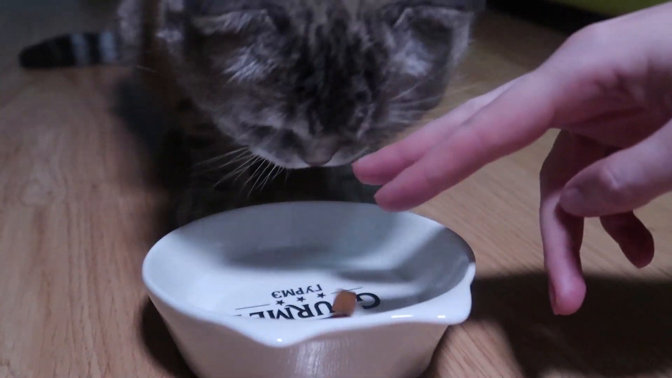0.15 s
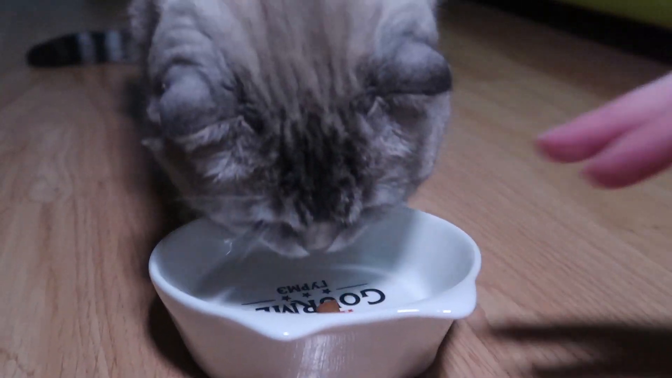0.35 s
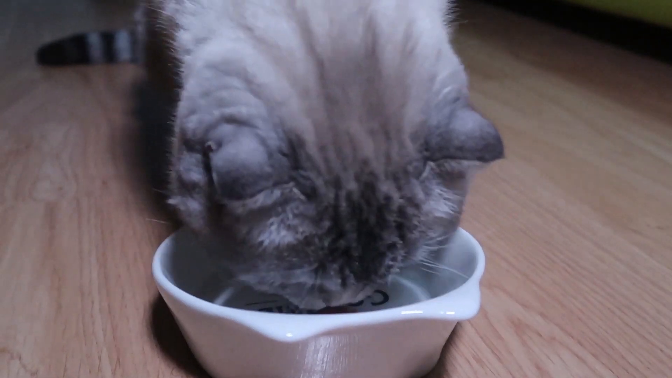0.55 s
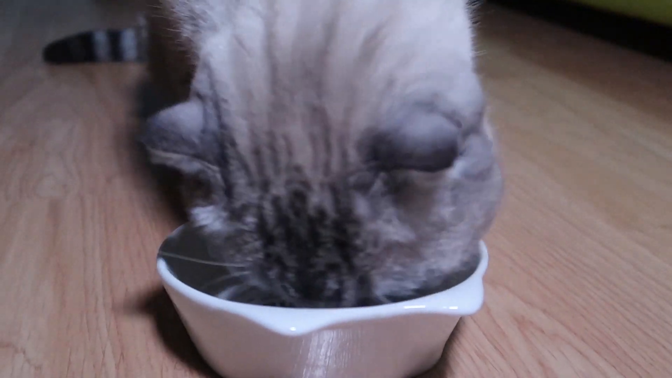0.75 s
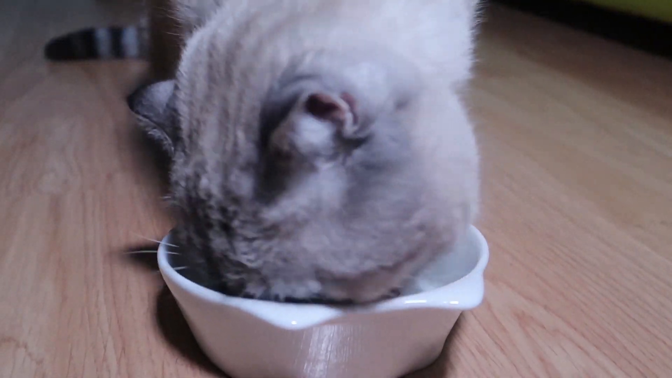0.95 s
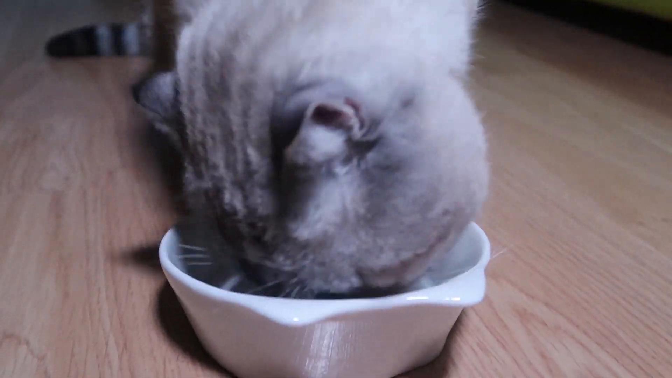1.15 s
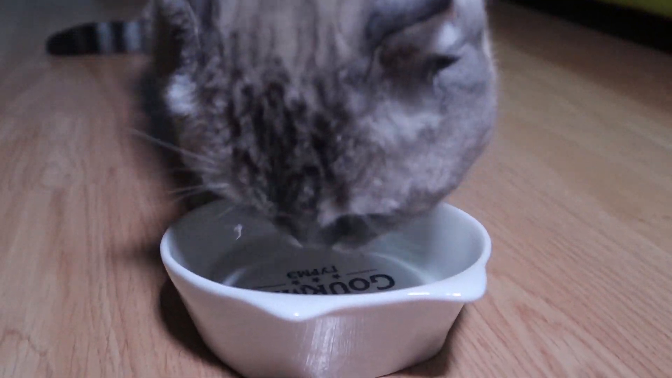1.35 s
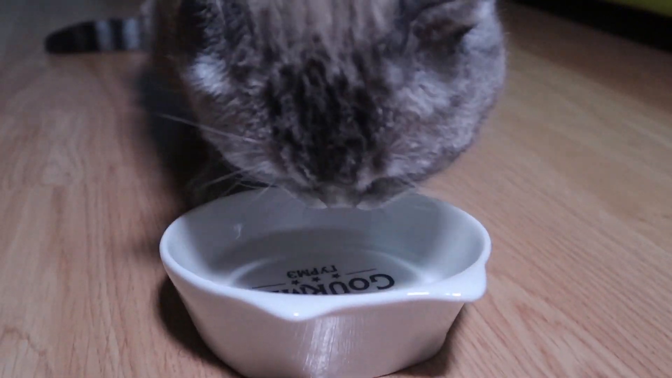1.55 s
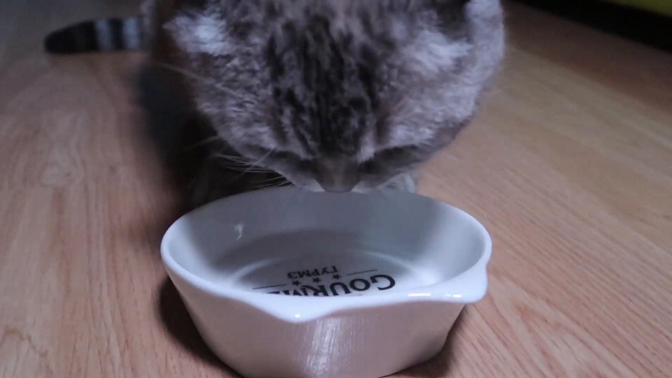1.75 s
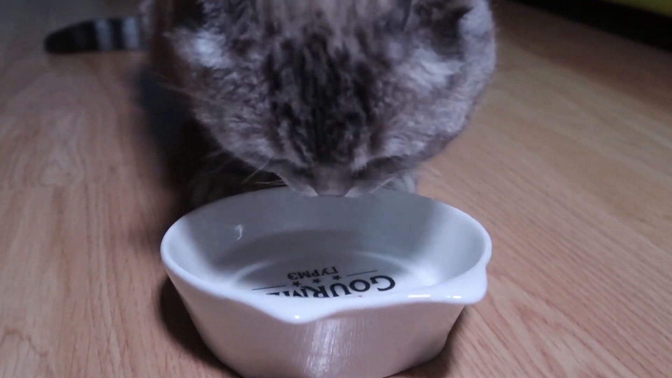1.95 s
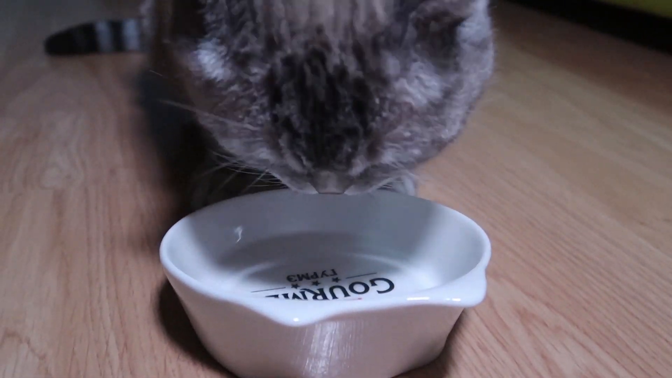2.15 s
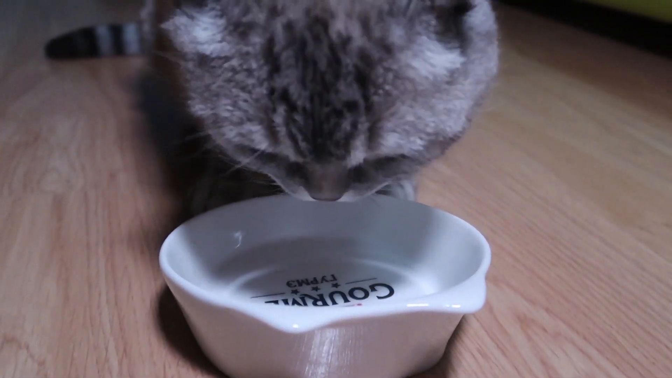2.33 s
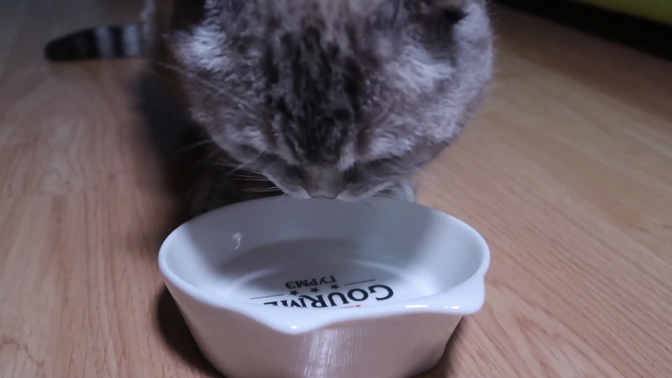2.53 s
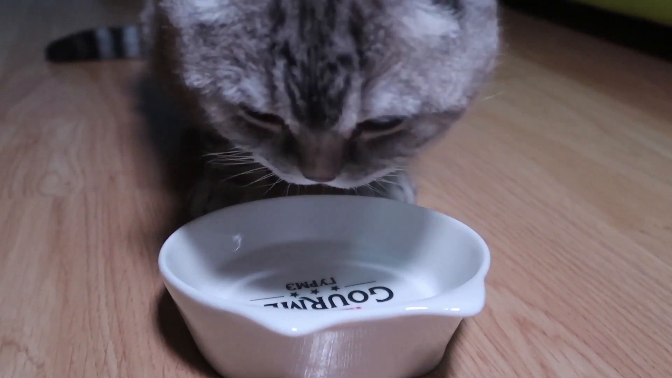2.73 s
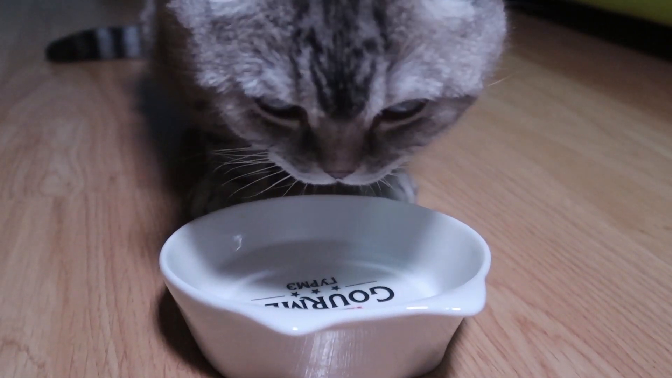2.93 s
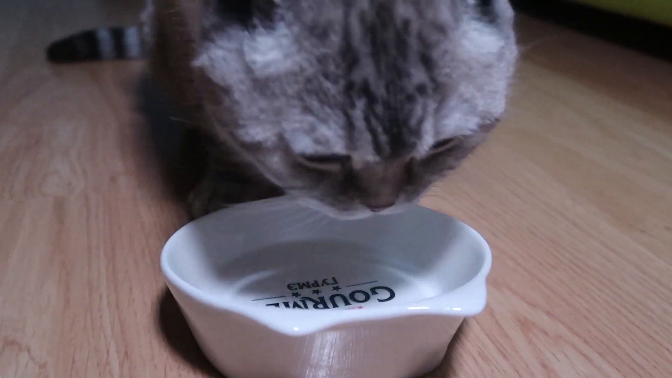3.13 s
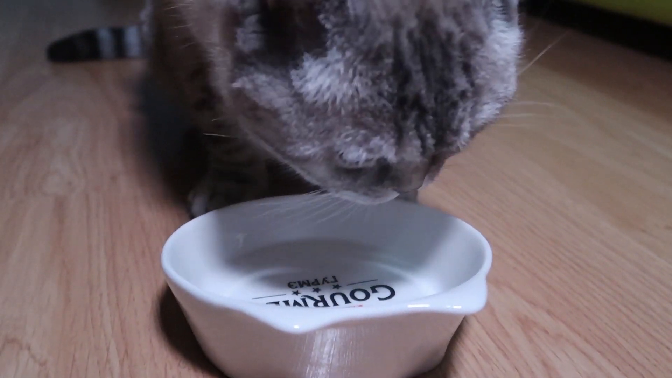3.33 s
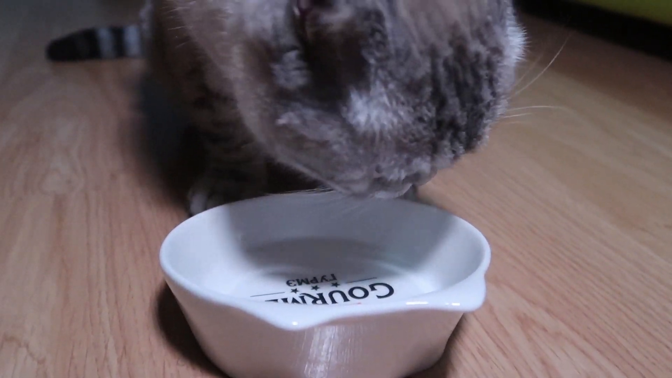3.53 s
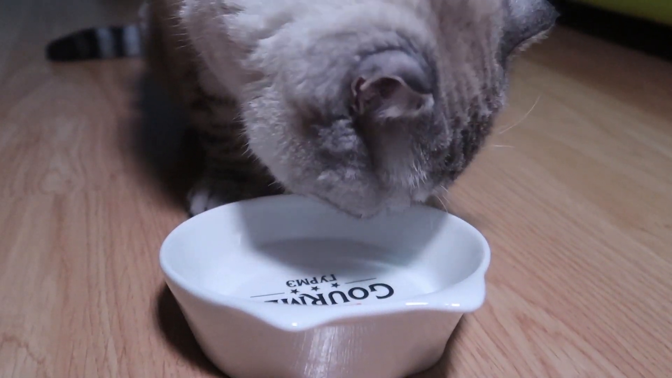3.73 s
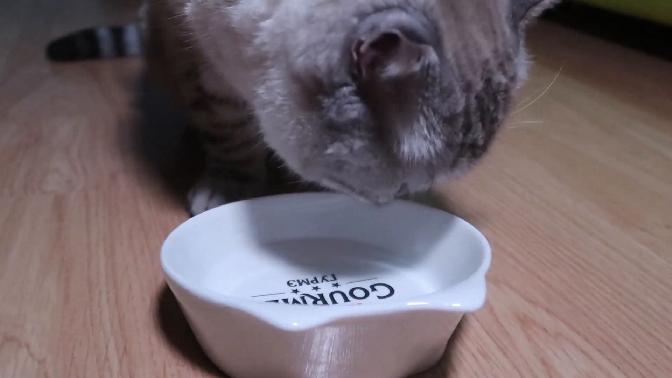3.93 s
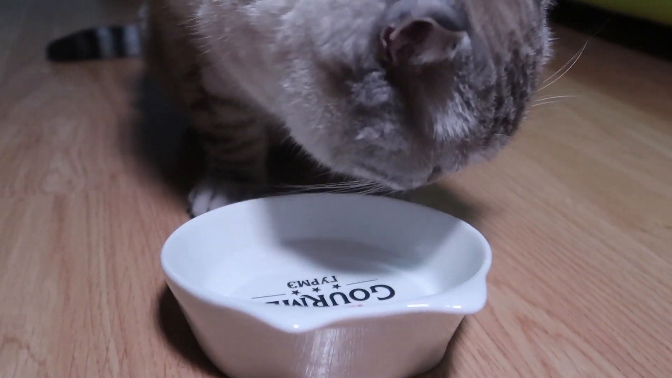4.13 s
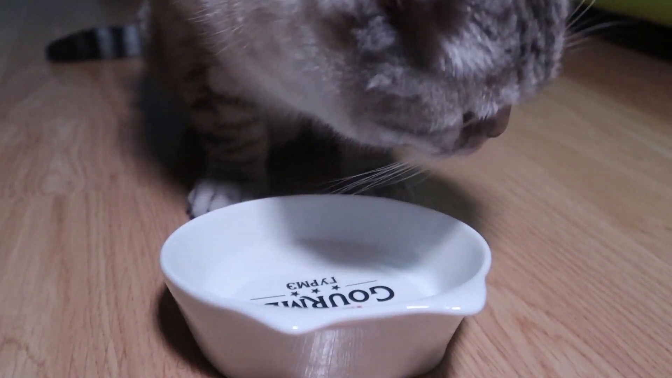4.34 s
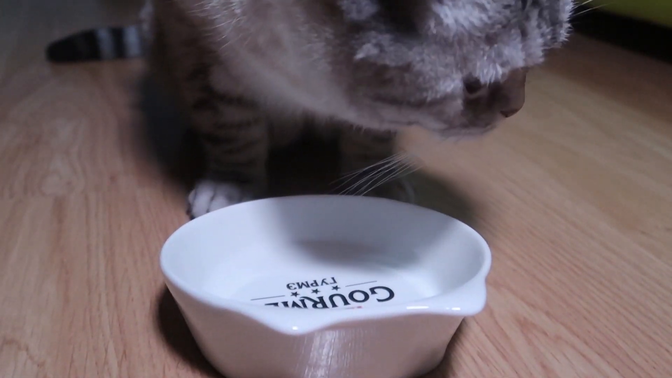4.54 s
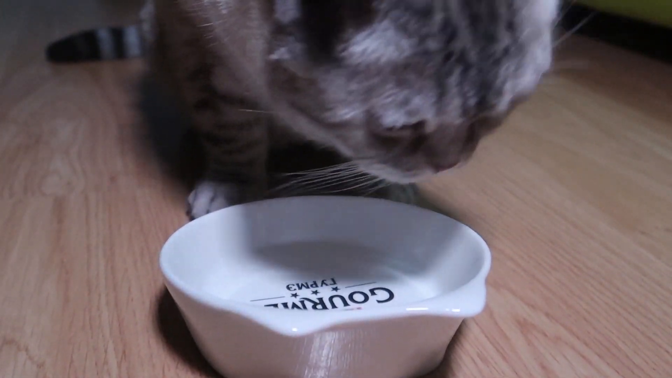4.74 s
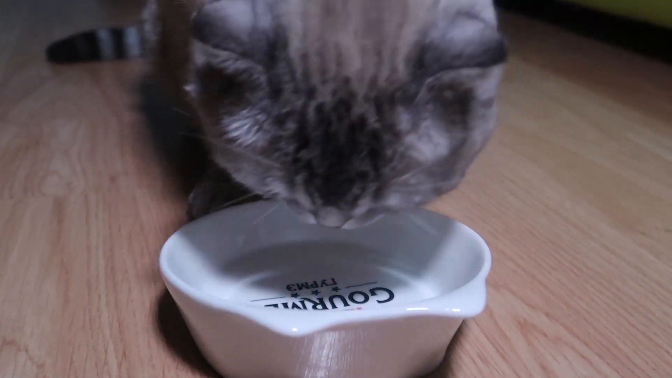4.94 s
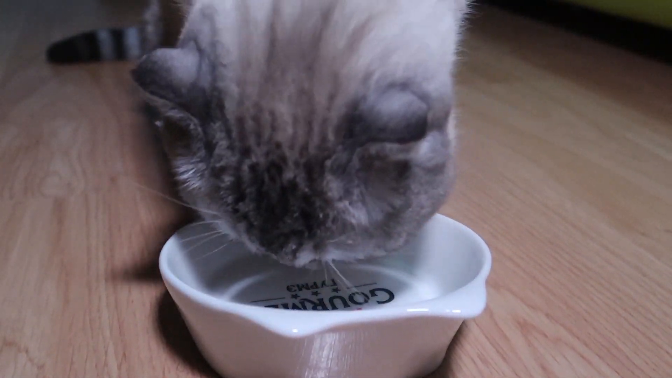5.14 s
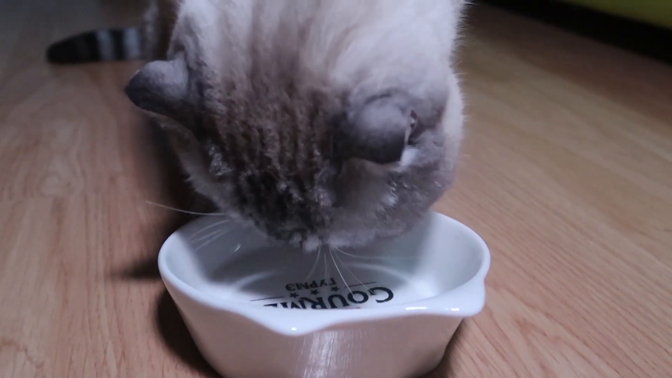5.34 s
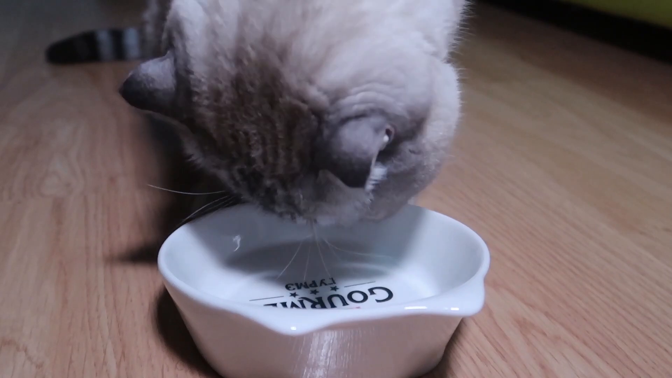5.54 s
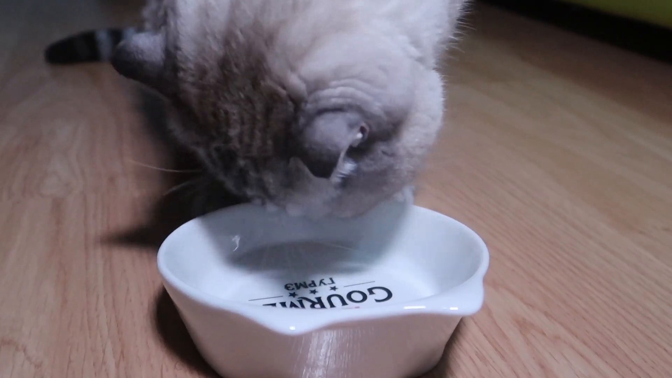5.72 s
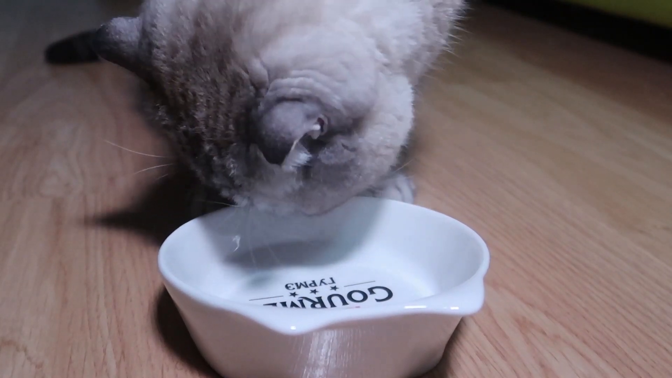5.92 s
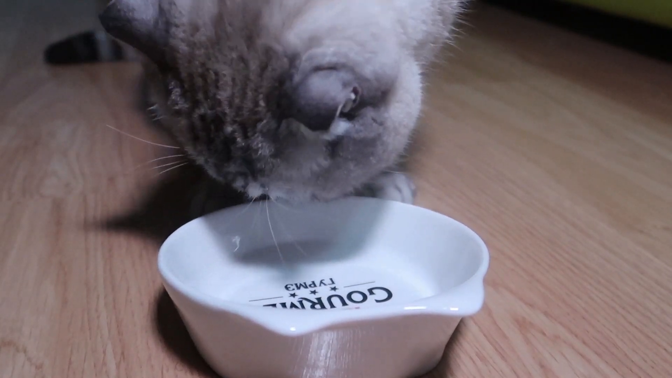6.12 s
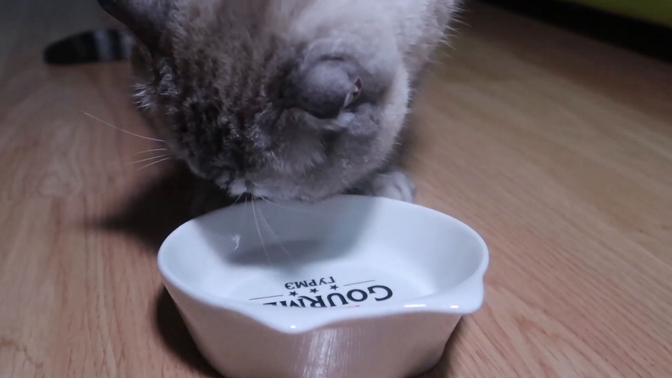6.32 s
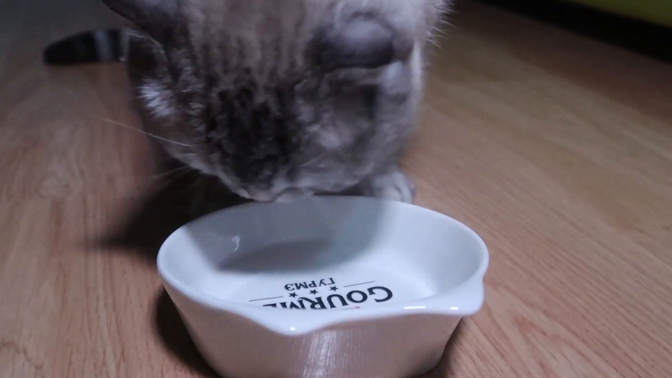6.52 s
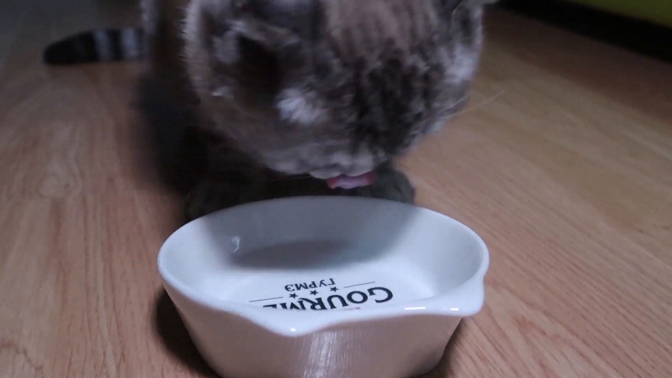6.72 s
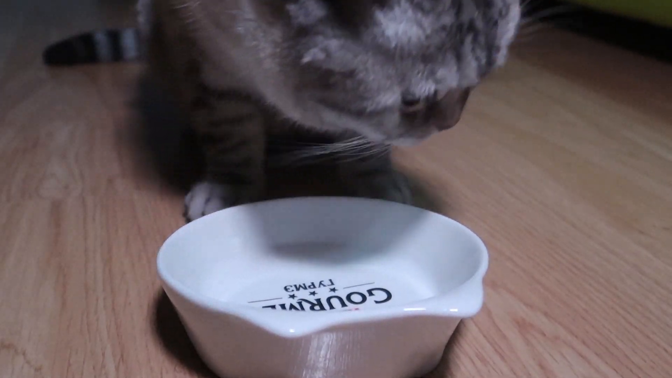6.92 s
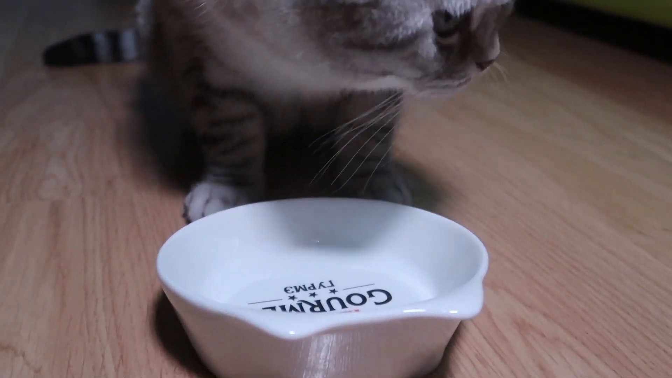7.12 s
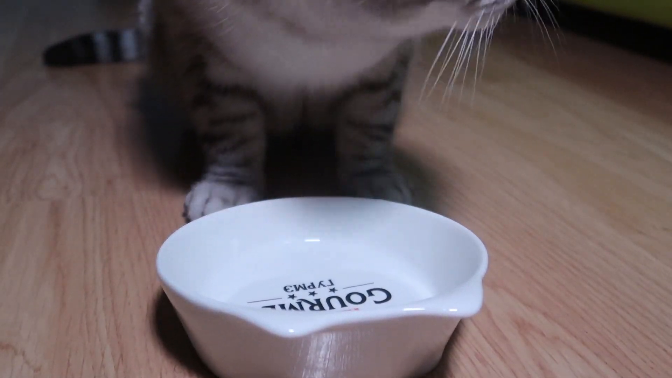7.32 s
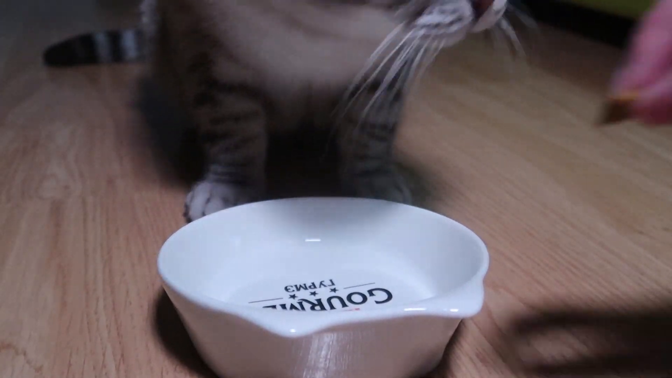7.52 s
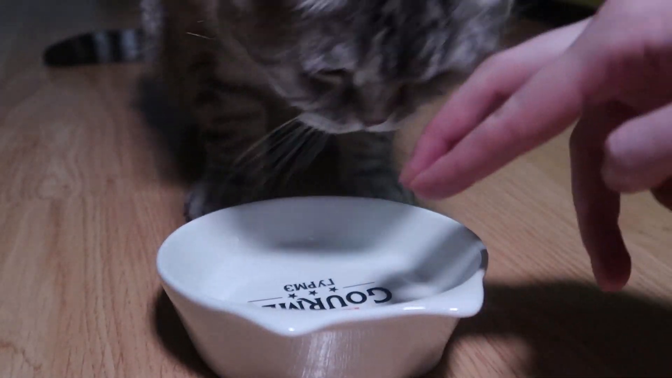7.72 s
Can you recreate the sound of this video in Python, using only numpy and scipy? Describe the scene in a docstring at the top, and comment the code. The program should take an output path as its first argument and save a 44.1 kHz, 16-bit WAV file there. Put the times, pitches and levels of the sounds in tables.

```python
"""A hard treat drops into a ceramic bowl on a wooden floor and bounces: struck modes ring, beat and clack.
A cat picks it up and smacks its lips: wet pops ring the mouth, and narrow noise makes the sticky slides.
Off to the right something crinkles and snaps, likely the treat pouch: buckling folds, rustle and hiss.
Then a second treat clinks in. In this small room a motor (fan or fridge) hums unevenly underneath,
built from sines at multiples of its wandering speed, with soft filtered noise for the air."""
import sys
import numpy as np
from scipy import signal
from scipy.fft import rfft, irfft, next_fast_len
from scipy.io import wavfile
from scipy.ndimage import uniform_filter1d

SR = 44100
rng = np.random.default_rng(int(sys.argv[2]) if len(sys.argv) > 2 else 0)


def wav_out(sig):
    """Save sig, one row per channel (or a flat mono array), as 16-bit PCM at SR to the path in sys.argv[1]."""
    wavfile.write(sys.argv[1], SR, np.round(np.clip(np.atleast_2d(sig).T, -1, 1) * 32767).astype(np.int16))


N = 347067
TIME = np.arange(N) / SR
BRIEF = TIME[:SR // 3]  # time axis of one short sound [s]
PADDED = next_fast_len(N, True)
BINS_HZ = np.fft.rfftfreq(PADDED, 1 / SR)

# Motor speed: (time [s], shaft speed [Hz])
MOTOR_SPEED = [(0.0, 38.33), (0.55, 38.1), (1.12, 38.24), (1.67, 37.33), (2.15, 37.9), (2.78, 37.92),
               (3.11, 36.48), (3.6, 38.08), (4.01, 37.2), (4.6, 38.5), (4.8, 37.86), (5.57, 36.98),
               (6.38, 37.46), (6.55, 37.7), (7.34, 36.9), (7.87, 37.8)]
# Tones at multiples of the shaft speed:
# (multiple, level against the usual hum [dB], share of the level swing, own waver [dB])
HUM_ORDERS = [(1, -11, .3, 3.5), (2, 0.07, 0.077, 1), (3, 0.5, 0.74, 0.7), (4, -8.5, 0.1, 2.4),
              (5, -18.5, .21, -1), (7, -37.5, 0.57, 0)]
# The hum swells and sags: (time [s], level [dB])
HUM_LEVEL = [(0.0, -39.5), (0.81, -37), (1.82, -40), (3.03, -39), (3.07, -50), (3.55, -39), (4.49, -39.5),
             (4.71, -44), (4.93, -38), (5.39, -42.5), (6.75, -39), (7.08, -43), (7.83, -40), (7.87, -36)]
# Colour of the room air: (frequency [Hz], level [dB])
AIR_COLOUR = [(100, 12), (200, 3), (300, 4), (500, -4), (800, -7), (1400, -9.5), (2500, -13.5),
              (4500, -18.5), (8000, -25), (11000, -30), (15000, -40.5)]
# Side signal of the air against its middle: (frequency [Hz], level [dB])
AIR_WIDTH = [(100, -52), (200, -7.5), (400, 0), (1000, 0.5), (3000, 1.5), (10000, 2)]
# Treat hitting the bowl: (time [s], level [dB], hardness [dB per octave], upper twins of the beating pairs [dB],
# clack of the treat [dB], lean of the struck spot [dB])
CLINKS = [(.2519, -25, 0, 9, -2, -6), (.2582, -20.5, -2.5, -14, -7, -0.5),
          (0.3314, -23.5, -1, -1.5, 2.5, 2), (0.3785, -43.5, -8, 10, 1, 3), (0.3864, -40, -18, 4, 4, 0),
          (0.4304, -34.5, -17, 0, -5, 8.5), (0.444, -53, -24, -11, 16, 0), (0.519, -59, -14, 5, -6, 0),
          (.668, -53.5, -14, -7, -16, 0), (0.941, -56, -14, -12, -18, 0), (7.8206, -20, 2.5, -10, -15, 5.5)]
# The bowl's wall rings in close pairs that beat: (frequency [Hz], level [dB], time to fall 60 dB [s],
# upper twin [0 or 1], gains or loses with the lean [-1 to 1])
BOWL_MODES = [(4445, 0.3, .094, 0, 0), (4605, -0.7, .094, 1, 0), (7876, -9.5, .066, 0, -1),
              (8106, -5.5, .092, 0, 1), (2067, -24.5, .23, 0, 0), (4030, -22, .025, 0, 0),
              (6915, -32, .12, 0, -1), (9620, -35, .08, 0, 0), (11355, -19, .055, 0, 1),
              (11550, -13, .045, 1, 0), (12800, -33, .07, 0, 0), (12970, -22, .06, 1, 0),
              (14560, -31, .06, 1, -1)]
# The bowl's base on the floor: (frequency [Hz], level [dB], time to fall 60 dB [s])
BASE_MODES = [(345, -6, 0.078), (413, -9, 0.035), (714, 3.5, 0.016), (1430, -12, 0.037), (1925, -14, 0.054)]
# Wet pops as lips and tongue part: (time [s], level [dB], mouth resonance [Hz], upper ring of the palate [dB],
# low ring of the jaw [dB], wet tick [dB])
SMACKS = [(1.642, -46, 2200, -9, 0, -11), (1.8243, -30.5, 1995, -2, -6, -14.5),
          (1.8252, -34, 1360, -20, -13, -20), (1.8273, -31, 2050, -20, -21, -30),
          (2.117, -57, 3570, -8, -15, 7), (2.3994, -33.5, 2130, -16, -21, -22),
          (2.449, -56.5, 6500, -6, -13, 11), (2.64, -41, 2280, -13, -17, -19),
          (2.6432, -47, 2110, -14, -17, -20), (2.702, -46, 2170, -4, -12, -8),
          (2.9017, -54.5, 1830, 8, 13, -15), (2.9461, -24.5, 2840, -28, -24, -26),
          (2.95, -47, 1430, -22, -20, -20), (2.9515, -32, 2290, -22, -29, -29),
          (2.956, -34, 2680, -20, -24, -25), (3.305, -45, 2210, -20, -24, -20),
          (3.3132, -40, 2350, -16, -22, -12), (3.3165, -32.5, 2270, -24, -30, -28),
          (6.6975, -32.5, 4060, -25, -15, -28), (6.7357, -35.5, 3100, -12, -12, -21),
          (7.05, -55.5, 2030, -5, -15, 7)]
# The tongue slides stickily: (time of the peak [s], level [dB], mouth resonance [Hz], rise and fall time [s])
SLIDES = [(.835, -55, 1410, 0.027), (1.642, -54.5, 2130, 0.023), (2.412, -51, 2220, 0.012),
          (2.709, -54, 1590, .016), (3.311, -47, 2150, 0.0084), (7.05, -57, 2060, .013)]
# Echoes off the floor and things close by: (lag [s], gain [factor])
NEARBY_ECHOES = [(.0017, 0.007), (.0029, 0.054), (.0054, .15)]
# Pouch folds buckling: (time [s], level [dB], pitch of the fold [Hz], flutter [dB], crackle [dB],
# time to fall 60 dB [s])
SNAPS = [(4.877, -27, 876, -4.5, -12.5, 0.021), (5.044, -40, 805, 0, 2, 0.025),
         (5.088, -38, 700, -11, -8, .018), (5.1131, -27.5, 500, -6, -8, 0.018),
         (5.113, -24, 1330, 0.5, -30, 0.018), (5.139, -13, 1630, -6, -23.5, 0.015),
         (5.2161, -24, 1290, -6, -24, 0.017), (5.2867, -30, 690, 1.5, -29, 0.022),
         (5.2893, -22, 1290, -9.5, -30, 0.021), (5.39, -36.5, 1004, -3, -25, 0.023),
         (5.518, -25.5, 910, -8, -17.5, .022), (5.694, -33, 961, -3, -17, 0.031),
         (5.787, -35.5, 720, 0, -12, 0.034), (5.8591, -23, 1110, -7.5, -13.5, 0.054),
         (5.8775, -18, 990, -6, -3, 0.033), (5.8786, -30, 424, 0, -1, 0.026),
         (5.9479, -31.5, 1800, -3, -8, 0.021), (6.012, -40, 627, 6, -23, 0.032),
         (6.029, -41, 1050, 2, -23, 0.042), (6.109, -35, 1010, -2, -11, 0.04),
         (6.124, -30, 1150, -9, -22, 0.028), (6.167, -36, 850, -1, -24, .028),
         (6.18, -40, 1110, -2, -24, 0.027), (6.194, -38, 755, 1, -22, 0.025),
         (6.326, -40, 1170, -7, -24, 0.026), (6.465, -36.5, 950, -11, -16, 0.025),
         (6.502, -38, 1500, -2, -14, 0.033), (6.631, -37, 905, -17, -17, 0.027),
         (6.686, -38, 1310, 0.5, -11, 0.024)]
# Fingers squeeze the pouch: (time [s], level [dB], hold [s], hiss of sliding foil against the rustle [dB])
SQUEEZES = [(4.749, -50, 0.082, -10.5), (4.896, -46.5, 0.025, -12), (5.057, -49, 0.059, -6.5),
            (5.2, -58, 0.024, -16), (5.304, -48, 0.038, -11), (5.432, -49.5, 0.053, -11),
            (5.784, -46.5, 0.026, -16), (5.967, -49, 0.085, -21), (6.166, -47, 0.018, -25),
            (6.409, -58, 0.14, -8), (6.695, -54, 0.063, -5)]
# Colour of the rustle: (frequency [Hz], level [dB])
RUSTLE_COLOUR = [(120, 0), (260, 9), (550, -2.5), (1000, 4.5), (1400, 0.5), (2200, 5.5), (3200, -5.5),
                 (6000, -11.5), (14000, -22)]
# Colour of the pouch in the left channel, which faces away from it: (frequency [Hz], level [dB])
LEFT_SHADE = [(300, 2), (600, 0.5), (1300, -3.5), (2800, -0.5), (6000, 0)]
# Colour of the reverberation from the wall: (frequency [Hz], level [dB])
WALL_COLOUR = [(300, -15), (900, -19), (1600, -10.5), (2800, -8.5), (4500, -5.5), (8000, -2), (13000, -6)]

WAVER_DB, WAVERS_PER_S = 1.27, 6.1  # the hum also wavers by chance
WHINE_HZ, WHINE_DB = 380, -58
MAINS_HZ, MAINS_DB = 50, -56
AIR_DB = -58
# A harder hit also knocks the base harder: dB at hardness 0, and dB more per dB of hardness
KNOCK_DB, KNOCK_PER_HARDNESS = -13.5, 2.9
# The mouth rings for a fixed number of cycles, so a high mouth ring is shorter
MOUTH_CYCLES = 28
# The palate rings at a fixed ratio above the mouth; the jaw keeps its pitch
PALATE_RATIO, JAW_HZ = 1.8, 780
# The rustle builds before each hold and settles after it
SQUEEZE_ATTACK_S, SQUEEZE_RELEASE_S = 0.033, 0.037
WALL_LAG_S, WALL_ECHO_DB = 0.019, -10.5
TOP_HZ = 14900  # upper limit of the final sound


def undb(db):
    """Turn decibels into a gain."""
    return 10 ** (np.asarray(db) / 20)


def unit(x):
    """Scale a sound to an average strength (rms) of 1."""
    return x / np.sqrt(np.mean(x ** 2))


def band(x, lo_hz, hi_hz, order=2):
    """Keep the range between two frequencies."""
    edges = [lo_hz, min(hi_hz, .45 * SR)]
    return signal.sosfilt(signal.butter(order, edges, "band", fs=SR, output="sos"), x)


def colour(x, points):
    """Shape a sound's spectrum through (frequency [Hz], level [dB]) points."""
    hz, db = np.transpose(points)
    gain = undb(np.interp(np.log(BINS_HZ + 1), np.log(hz), db))
    return irfft(rfft(x, PADDED) * gain, PADDED)[:N]


def walk(rate):
    """Drift smoothly by chance, with a spread near 1 and `rate` new values a second."""
    k = int(SR / rate)
    steps = np.repeat(rng.standard_normal(N // k + 1), k)
    return unit(uniform_filter1d(uniform_filter1d(steps, k), k)[:N])


def fade(t60):
    """Die away exponentially, falling 60 dB in t60 seconds."""
    return np.exp(-np.log(1000) * BRIEF / t60)


def ring(hz, t60, rise=0.00016):
    """Ring one struck mode; the push that starts it takes a moment."""
    push = 1 - np.exp(-(BRIEF / rise) ** 2)
    return np.sin(2 * np.pi * hz * BRIEF) * fade(t60) * push


def burst(lo_hz, hi_hz, t60, order=3):
    """Make a dying spray of noise, as strong as a mode with the same decay."""
    spray = band(rng.standard_normal(len(BRIEF)) * fade(t60), lo_hz, hi_hz, order=order)
    return unit(spray) * np.sqrt(np.mean(fade(t60) ** 2) / 2)


def add(track, s, sound):
    """Mix a sound in at time s."""
    i = int(round(s * SR))
    track[i:i + len(sound)] += sound[:N - i]


def room(x, pan_db, wet_db, lag_ms, t60=0.17, treble_t60=0.082):
    """Place a sound: the left hears it slightly later, and a diffuse tail follows whose treble dies first."""
    noise = rng.standard_normal((2, len(BRIEF)))
    tail = band(noise, 270, 5700) * fade(t60) + 2.55 * band(noise, 4160, 8100) * fade(treble_t60)
    tail = tail * np.clip(BRIEF / 0.0085 - .5, 0, 1)  # the tail starts late and swells in
    wet = signal.fftconvolve(x[None], unit(tail) / np.sqrt(len(BRIEF)), axes=1)[:, :N]
    # turning the phase delays the left smoothly, by any fraction of a millisecond
    delay = np.exp(-2j * np.pi * BINS_HZ * lag_ms / 1000)
    left = irfft(rfft(x, PADDED) * delay, PADDED)[:N]
    # half of the level difference goes to each side
    direct = np.array([left, x]) * undb(np.array([[pan_db], [-pan_db]]) / 2)
    return direct + undb(wet_db) * wet


def nearby(x):
    """Add the first close echoes, which comb the spectrum of each click."""
    return x + sum(gain * np.interp(TIME - lag, TIME, x) for lag, gain in NEARBY_ECHOES)


def motor(usual_db=-40.0, dispersion=1.09):
    """Hum at multiples of the wandering shaft speed, over mains hum at a fixed level and a thin whine."""
    speed_hz = np.interp(TIME, *np.transpose(MOTOR_SPEED))
    turn = 2 * np.pi * np.cumsum(speed_hz) / SR
    swing_db = np.interp(TIME, *np.transpose(HUM_LEVEL)) - usual_db + WAVER_DB * walk(WAVERS_PER_S)
    hum = np.zeros(N)
    for multiple, order_db, share, own_db in HUM_ORDERS:
        k = round(multiple)
        level_db = usual_db + order_db + share * swing_db + own_db * walk(5.4)
        # the floor carries each order at its own speed, which smears the once-a-turn knock into a drone
        hum += undb(level_db) * np.sin(k * turn - dispersion * k ** 2)
    whine = undb(WHINE_DB + walk(2.74) / 2) * np.sin(2 * np.pi * WHINE_HZ * TIME)
    mains = undb(MAINS_DB) * np.sin(2 * np.pi * MAINS_HZ * TIME)
    return np.sqrt(2) * (hum + whine + mains)  # a sine of rms 1 peaks at the root of 2


def air(rumble_db=-52, hiss_db=0):
    """Spread soft hiss wide over a low rumble that is the same on both sides."""
    mid, side = (colour(band(rng.standard_normal(N), 80, 19000), AIR_COLOUR) for _ in range(2))
    gain = undb(AIR_DB + hiss_db + 0.24 * walk(3.38)) / np.std(band(mid, 460, 15000))
    rumble = undb(rumble_db) * unit(band(rng.standard_normal(N), 52, 160))
    # the side signal is added on the left and taken away on the right
    spread = colour(side, AIR_WIDTH) * np.array([[1], [-1]])
    return gain * (mid + spread) + rumble


def bowl_wall(hardness_db, twin_db, lean_db):
    """Ring the bowl's wall: hardness tilts the treble, and the struck spot favours some modes."""
    wall = np.zeros(len(BRIEF))
    for hz, mode_db, t60, twin, lean in BOWL_MODES:
        octaves_up = max(np.log2(hz / 4500), 0)
        gain = undb(mode_db + hardness_db * octaves_up + lean * lean_db)
        # twins start in opposite phase, so each clink blooms for a moment before it beats
        sign = -undb(twin_db) if twin > .5 else 1
        wall += gain * sign * ring(hz, t60)
    return wall


def bowl(tick_db=-12, rock_s=.0011):
    """Each hit rings the wall and rocks the base on the floor; the hard treat itself clacks and ticks."""
    out = np.zeros(N)
    contact_t60 = .01
    for s, db, hardness_db, twin_db, clack_db, lean_db in CLINKS:
        wall = bowl_wall(hardness_db, twin_db, lean_db)
        base = sum(undb(mode_db) * ring(hz, t60, rock_s) for hz, mode_db, t60 in BASE_MODES)
        knock = undb(KNOCK_DB + KNOCK_PER_HARDNESS * hardness_db) * base
        clack = undb(clack_db) * burst(3720, 4720, contact_t60)
        tick = undb(tick_db + hardness_db) * burst(3700, 10000, contact_t60)
        add(out, s, undb(db) * (wall + knock + clack + tick))
    return room(out, pan_db=0.5, wet_db=-11.5, lag_ms=0.02, t60=0.22)


def mouth(spit_db=-13, rise_s=0.00047):
    """The tongue slides stickily; films of saliva break, often in a row, and ring the changing mouth."""
    out = np.zeros(N)
    for s, db, hz, palate_db, jaw_db, tick_db in SMACKS:
        cavity = ring(hz, MOUTH_CYCLES / hz, rise_s)
        palate = undb(palate_db) * ring(PALATE_RATIO * hz, 0.015)
        jaw = undb(jaw_db) * ring(JAW_HZ, 0.023)
        spit = undb(spit_db) * burst(0.78 * hz, 1.2 * hz, 0.038)
        tick = undb(tick_db) * burst(0.55 * hz, 3.7 * hz, 0.023)
        add(out, s, undb(db) * (cavity + palate + jaw + spit + tick))
    lead = .06  # seconds of build-up before the peak of a slide
    for s, db, hz, length in SLIDES:
        noise = unit(band(rng.standard_normal(len(BRIEF)), 0.86 * hz, 1.24 * hz))
        slide = noise * np.exp(-np.abs(BRIEF - lead) / length)
        add(out, s - lead, undb(db) * slide / np.sqrt(2))
    return room(nearby(out), pan_db=1.0, wet_db=-12, lag_ms=0.0061, t60=0.16)


def buckle(hz, flutter_db, crackle_db, t60, body_db=-14, fizz_db=-8, peak_cycles=0.84, flutter_lag_s=0.00129):
    """A fold snaps over in about one cycle; the foil crackles, and just after the snap it flutters."""
    age = hz * BRIEF / peak_cycles
    snap = np.sin(2 * np.pi * hz * BRIEF) * (age * np.exp(1 - age)) ** 4
    flutter = undb(flutter_db) * burst(0.498 * hz, 1.74 * hz, t60, order=5)
    flutter = flutter + undb(body_db) * ring(400, 0.0042)
    late_flutter = np.interp(BRIEF - flutter_lag_s, BRIEF, flutter, left=0)
    crackle = burst(1460, 4600, t60) + undb(fizz_db) * burst(3300, 12700, t60)
    return snap + late_flutter + undb(crackle_db) * crackle


def creases(per_s=1300, slide_db=-3.0, spread_db=2):
    """Tiny folds give way at random, each with its own pitch and size, over the hiss of sliding fingers."""
    out = undb(slide_db) * rng.standard_normal(N)
    start, end = SQUEEZES[0][0] - .07, SQUEEZES[-1][0] + .2
    age = BRIEF[:SR // 50]
    for when, pitch, size in rng.random((int(per_s * (end - start)), 3)):
        cycles = 350 * 18 ** pitch * age  # pitches from 350 to 6300 Hz
        gain = undb(spread_db * min(-np.log(size), 3))
        click = np.sin(2 * np.pi * cycles) * np.exp(-cycles / 2.9)
        add(out, start + when * (end - start), gain * click)
    return out


def grip(s, hold):
    """Effort of the fingers: a squeeze builds, holds and lets go."""
    before = np.maximum(s - TIME, 0)
    after = np.maximum(TIME - s - hold, 0)
    return np.exp(-before / SQUEEZE_ATTACK_S - after / SQUEEZE_RELEASE_S)


def far_wall(x, t60=0.3, treble_t60=0.12, treble_db=-4):
    """A wall returns one bright echo, inside a dense tail that darkens as it dies."""
    paths = rng.standard_normal((2, len(BRIEF)))
    split_hz = 5500
    low = band(paths, 220, split_hz) * fade(t60)
    high = undb(treble_db) * band(paths[::-1], split_hz, 14000) * fade(treble_t60)
    tail = (low + high) * np.clip(BRIEF / 0.007 - .5, 0, 1)
    tail = unit(tail) / np.sqrt(2 * len(BRIEF))
    wet = signal.fftconvolve(colour(x, WALL_COLOUR)[None], tail, axes=1)[:, :N]
    echo = np.interp(TIME - WALL_LAG_S, TIME, band(x, 2300, 11000))
    return wet + undb(WALL_ECHO_DB) * echo


def pouch(rustle_db=-4, hiss_db=-4):
    """Folds snap; under each squeeze tiny creases rustle and foil slides on foil."""
    snaps = np.zeros(N)
    for s, db, hz, flutter_db, crackle_db, t60 in SNAPS:
        add(snaps, s, undb(db) * buckle(hz, flutter_db, crackle_db, t60))
    rustle = undb(rustle_db) * unit(colour(creases(), RUSTLE_COLOUR))
    hiss = undb(hiss_db) * unit(band(rng.standard_normal(N), 2900, 7200))
    efforts = np.array([undb(db) * grip(s, hold) for s, db, hold, _ in SQUEEZES])
    sliding = undb([row[-1] for row in SQUEEZES])[:, None]
    # the strongest squeeze at each moment sets the level
    out = snaps + rustle * efforts.max(axis=0) + hiss * (sliding * efforts).max(axis=0)
    left, right = room(nearby(out), pan_db=-1.5, wet_db=-19, lag_ms=0.042) + far_wall(out)
    return np.array([colour(left, LEFT_SHADE), right])


def scene():
    """Bowl, cat and pouch in the humming room."""
    return motor() + air() + bowl() + mouth() + pouch()


def record(dry):
    """Cut the highest treble steeply above TOP_HZ."""
    return signal.sosfilt(signal.ellip(8, .2, 70, TOP_HZ, fs=SR, output="sos"), dry)


dry = scene()
out = record(dry)
wav_out(out)
```